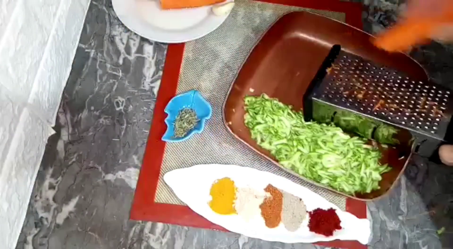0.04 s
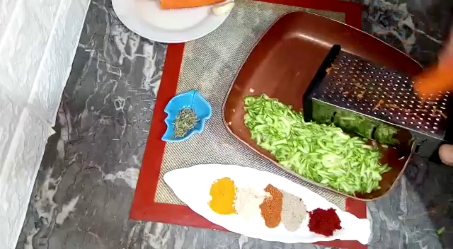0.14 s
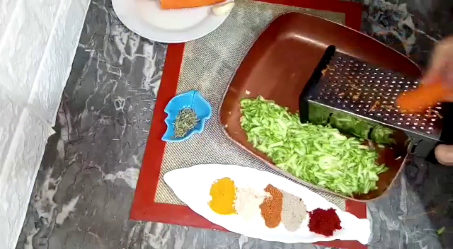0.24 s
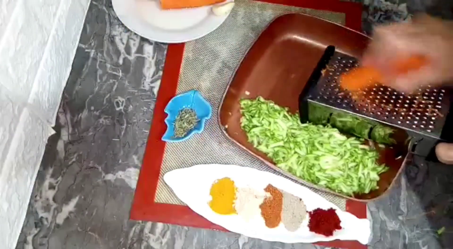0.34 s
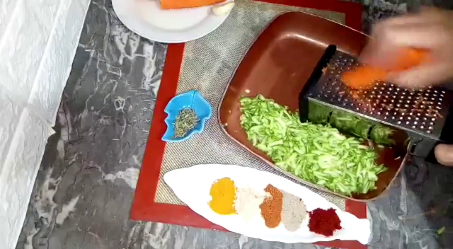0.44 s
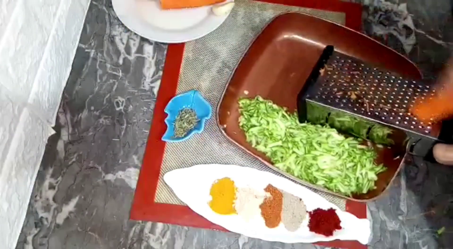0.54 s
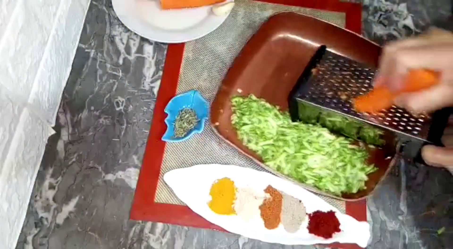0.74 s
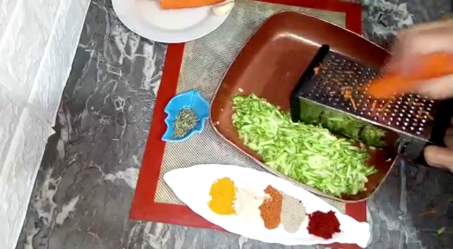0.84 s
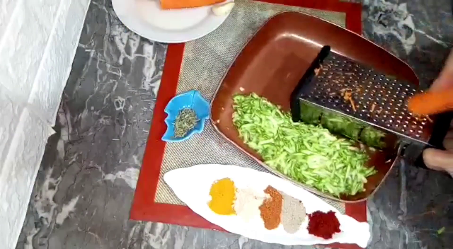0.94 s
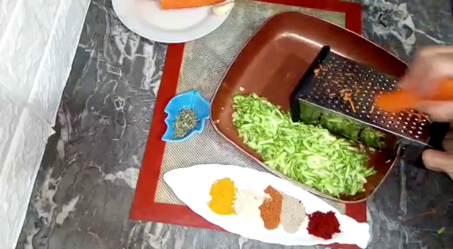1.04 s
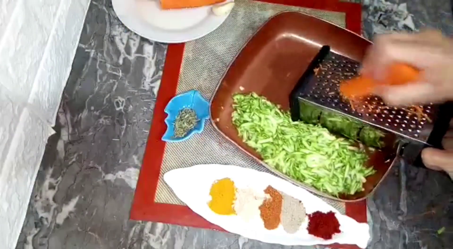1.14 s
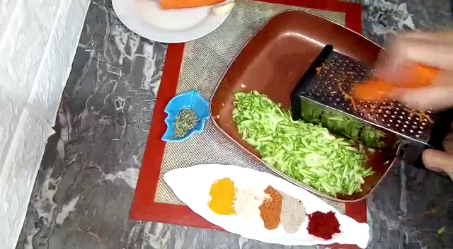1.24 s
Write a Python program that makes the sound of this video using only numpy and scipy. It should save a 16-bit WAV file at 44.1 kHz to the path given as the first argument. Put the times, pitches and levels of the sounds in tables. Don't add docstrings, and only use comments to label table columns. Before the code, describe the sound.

Brief gritty rasps of carrot on metal teeth, a soft dish knock and two rattling steel clangs come first; faint tooth ticks, a spoon clink and low refrigerator hum follow in a small, lively kitchen, heard close up.

```python
import sys
import numpy as np
from scipy import signal
from scipy.fft import rfft, irfft
from scipy.io import wavfile
from scipy.ndimage import map_coordinates

SR = 44100
rng = np.random.default_rng(int(sys.argv[2]) if len(sys.argv) > 2 else 0)


def convert_level_to_amplitude(level_db):
    exponent = np.asarray(level_db, float) / 20
    return 10 ** exponent


def generate_wav(signal):
    frames = np.transpose(np.atleast_2d(signal))
    scaled = np.clip(frames, -1, 1) * 32767
    pcm = np.round(scaled).astype(np.int16)
    wavfile.write(sys.argv[1], SR, pcm)


N = 57330


def rms_one(x):
    return x / np.sqrt(np.mean(x ** 2) + 1e-30)


def at_hz(points, hz):
    p = np.array(points)
    return np.interp(np.log(np.maximum(hz, 1)), np.log(p[:, 0]), p[:, 1])


def colour(x, spectrum):
    gain = convert_level_to_amplitude(at_hz(spectrum, np.fft.rfftfreq(len(x), 1 / SR)))
    return irfft(rfft(x) * rms_one(gain), len(x))


def drift(rate):
    knots = rng.standard_normal(256)
    return map_coordinates(knots, [8 + np.arange(N) * rate / SR], order=3, mode="mirror")


def burst(start, rise, hold, fall):
    t = np.arange(N) / SR - start
    return np.clip(t / rise, 0, 1) * np.exp(-np.maximum(t - rise - hold, 0) / fall)


def ring(push, hz, t60):
    r, w = convert_level_to_amplitude(-60 / (t60 * SR)), 2 * np.pi * hz / SR
    return signal.lfilter([0, np.sin(w)], [1, -2 * r * np.cos(w), r * r], push + 1e-18)


def strike(hits, modes, cycles=1.9, flutter_db=2.5):
    clicks, out = np.zeros(N), 0
    for start, db in hits:
        clicks[int(start * SR)] = convert_level_to_amplitude(db)
    for k, (hz, db, t60) in enumerate(modes):
        n = np.arange(int(cycles * SR / hz) + 2)
        window = np.sin(np.pi * n / len(n)) ** 2
        touch = window * np.cos(2 * np.pi * hz * n / SR) * 4 / len(n)
        rung = ring(np.convolve(clicks, touch)[:N], hz, t60)
        flutter = flutter_db * drift(40.0)
        out = out + convert_level_to_amplitude(db + flutter) * rung * (-1) ** k
    return out


# start in seconds, swell in seconds,
# hold in seconds, level in dB.
CARROT_STROKES = [
    (-.004, .004, 0.014, -36.5),
    (0.019, .004, .03, -55),
    (0.178, .003, 0.042, -58.5),
    (0.206, .013, 0.0094, -37),
    (0.249, .009, 0.018, -46),
    (0.3, .004, 0.055, -49),
    (0.31, .018, 0.014, -34.5),
]
# frequency in Hz, density in dB per Hz.
RASP_COLOUR = [(250, -27), (600, -10.5), (1560, -6.5), (3640, -10.5), (5300, -3), (6800, -9.5),
               (7600, -18.5), (16000, -34)]
# frequency in Hz, level in the first clang in dB,
# level in the second clang in dB, decay time t60 in seconds.
GRATER_MODES = [(801, -10.5, -26, 0.29), (1053, -14, -7, 0.1), (1429, -15, -12, 0.15),
                (1581, -5, -11, 0.23), (2023, -11.5, -16.5, 0.2), (2448, -8, -19, 0.078),
                (2934, -14.5, -22, .25), (3615, -17, -26, 0.5), (3966, -10.5, -20.5, 0.22),
                (5126, -29, -18, 0.18), (5797, -6.5, -3.5, 0.14), (5732, 6.5, -1, 0.018),
                (6795, -10, -26.5, 0.082), (11380, -39, -39.5, .12)]


def rasp():
    grains_per_s, fall_s, body_db = 8400, 0.01, -35
    grains = (rng.random(N) < grains_per_s / SR) * rng.choice([-1, 1], N)
    grains = rms_one(grains)
    level = 0
    for start, swell, hold, db in CARROT_STROKES:
        level = level + convert_level_to_amplitude(db) * burst(start, swell, hold, fall_s) ** 2
    cutting = grains * level
    body = sum(convert_level_to_amplitude(body_db + db) * ring(cutting, hz, t60) for hz, _, db, t60 in GRATER_MODES)
    return colour(grains, RASP_COLOUR) * level + body


# start in seconds, level in dB, chatter length in seconds.
GRATER_CLANGS = [
    (.272, -21.5, .012),
    (.351, -22.5, 0.0079),
]
# frequency in Hz, density in dB per Hz.
CRACK_COLOUR = [(200, -31.5), (700, -9.5), (1900, -0.5), (3000, -9), (4040, -4.5), (4750, -24), (5800, 0),
                (7600, -36)]


def grater():
    crack_db, crack_top_hz = 3.5, 9000
    crack = colour(rng.standard_normal(N), CRACK_COLOUR)
    crack = signal.sosfilt(signal.butter(1, crack_top_hz, fs=SR, output="sos"), crack)
    out = np.zeros(N)
    for k, (start, db, chatter) in enumerate(GRATER_CLANGS):
        modes = [(row[0], row[1 + k], row[3]) for row in GRATER_MODES]
        out += convert_level_to_amplitude(db + crack_db) * crack * burst(start, 0.00017, chatter / 2, chatter / 3)
        out += strike([(start, db)], modes)
    return out


# start in seconds, level in dB.
DISH_THUDS = [
    (.210, -46),
    (.2165, -33),
    (.220, -24),
    (.2235, -17),
    (.241, -38),
    (.273, -36),
    (.352, -33),
]
# frequency in Hz, level in dB, decay time t60 in seconds.
DISH_MODES = [(235.9, -11, .07), (489, -3.5, 0.038), (669, -8, 0.13), (734, -0.5, .07), (799.7, -11, 0.12),
              (849, -9.5, 0.045), (1080, -13, 0.041), (1344, -12, .04), (1980, -9.5, .03)]


def dish():
    push = (128.7, -11, .06)  # Hz, dB, t60 in s
    return strike(DISH_THUDS, DISH_MODES + [push], cycles=0.51, flutter_db=4.5)


# start in seconds, level in dB, pitch in Hz,
# decay time t60 in seconds.
TOOTH_TICKS = [(0.13, -54, 4570, 0.074), (.135, -58, 3600, .04), (.180, -32, 5700, 0.018),
               (0.18, -44.5, 6800, .025), (.182, -41, 4900, 0.017), (.257, -46, 4650, .03),
               (.272, -50, 13500, .08), (.290, -56, 11380, .15), (.595, -60, 5530, .03),
               (.612, -65, 8590, .16), (0.67, -63.5, 7000, .17), (.666, -63, 5400, .06),
               (.690, -68, 2008, .2), (0.72, -57, 5550, 0.024), (0.69, -57, 5350, 0.019),
               (.767, -68, 11900, .04), (.790, -65, 3050, .25), (.930, -70, 3280, .4),
               (1.170, -72.5, 3503, 0.71), (1.292, -56, 3100, .012), (1.293, -57, 4200, .012)]
# start in seconds, level in dB.
TOOTH_FLICKS = [
    (.766, -48),
    (.769, -51),
    (.776, -53),
    (.783, -48),
    (.791, -53.5),
    (.800, -61),
    (.813, -62),
    (.825, -63),
]
# frequency in Hz, level in dB, decay time t60 in seconds.
TOOTH_MODES = [(4727, -7, .05), (4860, -28, .035), (5200, -9, .025), (5360, -8, .03), (5460, 0.5, .035),
               (5590, -0.5, .035), (5700, -12, .04)]


def teeth():
    out = 0
    for start, db, hz, t60 in TOOTH_TICKS:
        pair = [(hz, 0, t60), (hz * 1.022, -5, t60 * 0.42)]
        out = out + strike([(start, db)], pair, cycles=9)
    return out + strike(TOOTH_FLICKS, TOOTH_MODES, cycles=9)


# start in seconds, level in dB.
SPOON_CLINKS = [
    (1.030, -66.5),
    (1.034, -47),
]
# frequency in Hz, level in dB, decay time t60 in seconds.
SPOON_MODES = [(1939, 5, 0.069), (2293, -6.5, 0.29), (2683, -5.5, 0.16), (2870, -1, 0.099), (3747, -8, .25),
               (4522, -9, 0.076), (6876, 1, .085), (7844, 7, .055), (8720, -1, .05), (9660, -0.5, 0.041),
               (11300, -11, 0.055), (11550, -1, 0.042), (13430, -20, .04), (14300, -3, .035)]
# frequency in Hz, density in dB per Hz.
CLINK_COLOUR = [(1200, -42), (1900, -4), (3000, -0.5), (5500, -13), (7100, -6), (14400, -24), (16000, -30)]


def spoon():
    crack_db, clink_s = -49, SPOON_CLINKS[1][0]
    crack = colour(rng.standard_normal(N), CLINK_COLOUR) * burst(clink_s, 0.0025, 0.00523, 0.011)
    return strike(SPOON_CLINKS, SPOON_MODES, cycles=12) + convert_level_to_amplitude(crack_db) * crack


# start in seconds, level in dB, pitch in Hz.
COUNTER_THUMPS = [
    (0.21, -44.5, 110),
    (0.224, -51, 45.17),
    (0.308, -53.5, 110),
    (.385, -58.5, 180),
    (0.944, -62.5, 70),
]


def counter():
    out = 0
    for start, db, hz in COUNTER_THUMPS:
        out = out + strike([(start, db)], [(hz, 0, .1)], cycles=1.4, flutter_db=0.5)
    return out


# frequency in Hz, decay time t60 in seconds.
KITCHEN_T60 = [(150, 0.4), (500, 0.36), (1500, 0.33), (4000, 0.35), (7000, 0.29), (12000, 0.057)]


def kitchen(x):
    onset_s = 0.0072
    t, tail = np.arange(N) / SR, 0
    edges = 60 * 2 ** np.arange(0, 8.6, .5)
    white = rng.standard_normal((2, N))
    for k, (low, high) in enumerate(zip(edges, edges[1:])):
        band_pass = signal.butter(2, [low, high], "band", fs=SR, output="sos")
        band = signal.sosfilt(band_pass, white[k % 2])
        tail = tail + band * convert_level_to_amplitude(-60 * t / at_hz(KITCHEN_T60, np.sqrt(low * high)))
    tail = tail * np.clip(t / onset_s, 0, 1) ** 2
    return signal.fftconvolve(x, tail / np.sqrt(np.sum(tail ** 2)))[:N]


# frequency in Hz, level in dB, swell in dB per second.
FRIDGE_HUM = [(100.5, -73.5, -0.3), (289, -75.5, -6), (356, -82, 6.7), (439, -76.5, 16), (508, -82.5, 8),
              (544, -76.5, 9), (791, -84, 5.5), (2008, -84, 2.7)]
# frequency in Hz, density in dB per Hz.
AIR_COLOUR = [(30, -13), (104, 0), (500, -7.5), (1300, -16), (3500, -14.5), (6300, -16.5), (7600, -24),
              (16000, -29.5)]


def background():
    waver_db, air_db = 2.5, -69
    t, hum = np.arange(N) / SR, 0
    swell_time = np.maximum(t, .5) - 0.97
    for hz, db, swell in FRIDGE_HUM:
        level = convert_level_to_amplitude(db + swell * swell_time + waver_db * drift(6.8))
        hum = hum + level * np.sin(2 * np.pi * (hz * t + rng.random()))
    air = colour(rng.standard_normal(N), AIR_COLOUR)
    return hum + convert_level_to_amplitude(air_db + 1.3 * drift(4.7)) * air


def scene():
    mic_low_hz, room_db, teeth_room_db = 70, -9, -1.5
    loud = rasp() + grater() + dish() + spoon()
    loud = signal.sosfilt(signal.butter(2, mic_low_hz, "high", fs=SR, output="sos"), loud)
    small = teeth()
    room = convert_level_to_amplitude(room_db) * kitchen(loud + convert_level_to_amplitude(teeth_room_db) * small)
    return (loud + small + room + counter() + background())[None]


def band_limit(x):
    return signal.sosfilt(signal.butter(12, 16150, fs=SR, output="sos"), x)


def record(dry):
    top_cut = signal.cheby2(16, 50, 16400, fs=SR, output="sos")
    mix = signal.sosfilt(top_cut, dry)
    return band_limit(mix)


dry = scene()
out = record(dry)
generate_wav(out)
```